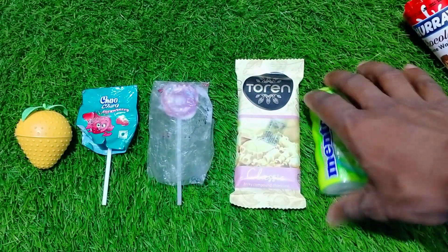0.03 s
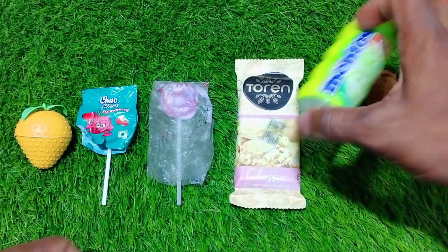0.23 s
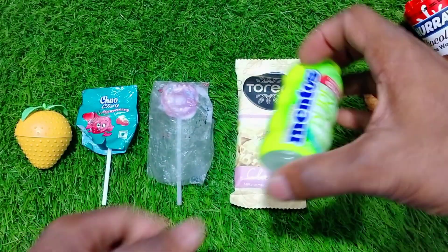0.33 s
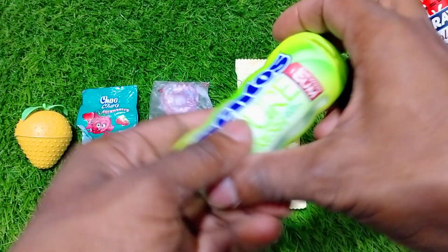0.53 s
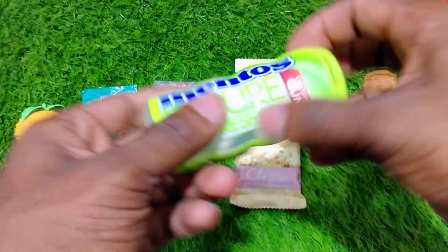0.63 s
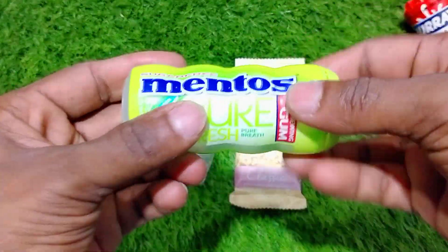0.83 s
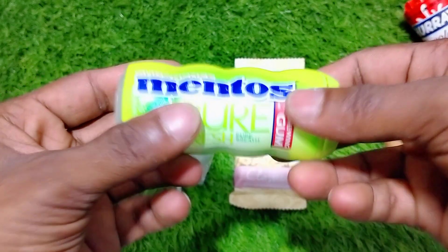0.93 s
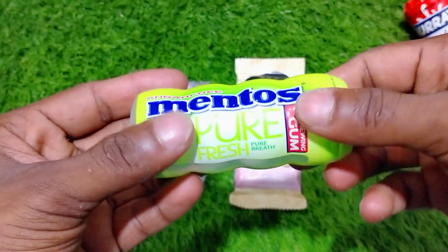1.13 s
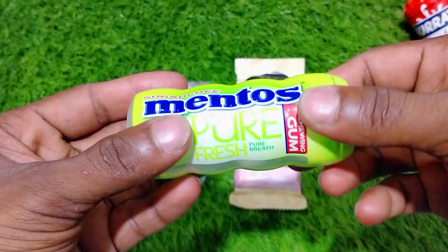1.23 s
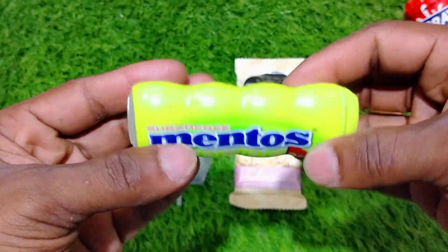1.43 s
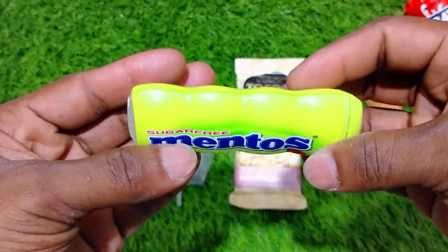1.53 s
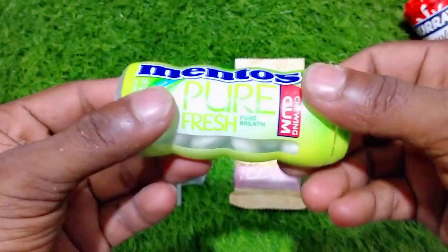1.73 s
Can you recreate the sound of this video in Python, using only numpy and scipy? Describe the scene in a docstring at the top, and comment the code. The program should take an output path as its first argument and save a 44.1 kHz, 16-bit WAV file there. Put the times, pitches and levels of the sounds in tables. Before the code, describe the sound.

Two short rattles of hard candies come from a small plastic bottle handled close to the microphone in a quiet room. Between them come a few clicks and soft rubbing, and faint finger taps follow the second.

```python
"""Hard candies tumble inside a small plastic bottle, close to the microphone in a small quiet room:
once as the bottle is lifted and once as it is turned over. Each knock rings the hollow body and
the stiff wall, with a bright crack at the contact. Fingers tap and slide on the plastic around the
tumbles, and the other hand takes hold with a soft thump. Low rumble and room tone lie underneath."""
import sys
import numpy as np
from scipy import signal
from scipy.fft import rfft, irfft
from scipy.io import wavfile

SR = 44100
rng = np.random.default_rng(int(sys.argv[2]) if len(sys.argv) > 2 else 0)


def log_audio(samples):
    """Write samples as a 16-bit WAV file to the path given in sys.argv[1]."""
    # one column per channel
    frames = np.atleast_2d(samples).T
    # limit to full scale, then quantise
    limited = np.clip(frames, -1, 1)
    pcm = np.round(limited * 32767).astype(np.int16)
    wavfile.write(sys.argv[1], SR, pcm)


N = 79380

# Candies hitting the bottle. Each row: start in seconds, relative levels of body, wall and crack
# in dB, wall pitch in Hz, body pitch in Hz.
CANDY_KNOCKS = [(0.177, -36.5, -42.5, -49, 2310, 1077), (0.1911, -39, -43, -49.5, 2310, 1060),
                (0.1973, -36.5, -39, -47, 2330, 950), (0.2014, -44, -34.5, -39, 2300, 885),
                (0.2032, -25, -18.5, -26.5, 2280, 894), (0.2081, -33.5, -25.5, -43.5, 2300, 970),
                (0.2098, -27, -36, -43, 2250, 950), (0.2133, -47, -31.5, -39.5, 2280, 895),
                (0.2179, -39.5, -29.5, -40.5, 2280, 910), (0.22, -27.5, -26, -37.5, 2220, 974),
                (0.2238, -34.5, -30.5, -39, 2250, 1080), (0.2325, -27.5, -26.5, -34, 2350, 850),
                (0.2435, -39, -38, -41, 2400, 972), (0.2455, -34, -36, -42.5, 2530, 1020),
                (0.2496, -26, -29, -36.5, 2420, 1036), (0.252, -28.5, -37, -42, 2290, 1142),
                (0.2571, -35.5, -23, -33.5, 2190, 1220), (0.2599, -29.5, -34, -35, 2130, 1080),
                (0.2697, -35, -25.5, -41.5, 2380, 1097), (0.2823, -39.5, -36, -48.5, 2160, 1040),
                (0.288, -39, -41, -51, 1950, 1260), (0.3297, -48, -40.5, -52.5, 2240, 1020),
                (0.353, -53, -42.5, -58, 2150, 1120), (0.3735, -48, -40.5, -57, 2130, 960),
                (0.3973, -53, -55, -71, 1850, 1090), (0.4134, -52.5, -48.5, -62, 2470, 1180),
                (0.4445, -40.5, -43, -41, 2400, 1100), (0.4471, -26.5, -31, -38.5, 2540, 1073),
                (0.4658, -55, -37.5, -58, 2180, 990), (0.4759, -38.5, -36, -54, 1750, 1160),
                (0.4808, -56, -46.5, -55, 2070, 1150), (0.9797, -30, -40.5, -33, 2230, 1007),
                (0.9846, -39, -38, -44.5, 1940, 1010), (0.9926, -46.5, -44, -59.5, 2290, 1130),
                (1.0035, -36.5, -40.5, -42.5, 2190, 1070), (1.0087, -38.5, -28.5, -39.5, 2060, 1230),
                (1.0212, -31.5, -33, -46.5, 1800, 1010), (1.0255, -44.5, -30.5, -36, 2980, 960),
                (1.0308, -31, -32, -40.5, 2630, 1064), (1.036, -31.5, -34.5, -40.5, 2110, 1040),
                (1.0428, -25, -24, -23.5, 2130, 854), (1.0445, -28, -29, -26, 2100, 756),
                (1.0535, -30, -27.5, -36.5, 2150, 1000), (1.06, -27, -33, -36.5, 2170, 1010),
                (1.081, -36, -34.5, -48, 1930, 1050), (1.089, -44, -33, -47.5, 2020, 1180),
                (1.0934, -31, -31.5, -43.5, 2040, 1000), (1.0967, -35.5, -44, -53, 2310, 992.5),
                (1.112, -31.5, -38, -46, 2040, 985.5), (1.1159, -35.5, -37.5, -56, 2120, 990),
                (1.1227, -38.5, -26, -39, 2080, 1046), (1.1288, -46, -38, -47.5, 1990, 1190),
                (1.1346, -32.5, -27.5, -31, 1940, 1050), (1.1486, -28, -31.5, -34, 2420, 1000),
                (1.1516, -44.5, -28.5, -37.5, 2770, 860), (1.2282, -34.5, -38.5, -45, 2230, 1067),
                (1.2446, -46, -48, -58, 1930, 1074)]
# Fingers tapping the bottle. Each row: the same columns as the candy knocks.
FINGER_TAPS = [(0.0274, -35, -44.5, -61, 2630, 1090), (0.0312, -45.5, -37, -52, 2490, 980),
               (0.0584, -42.5, -44, -73, 2864, 1040), (0.0625, -50.5, -50, -68.5, 2610, 990),
               (0.0856, -44, -47.5, -81, 2570, 920), (0.1093, -59.5, -50.5, -59, 2470, 1010),
               (0.118, -41.5, -46.5, -69, 2580, 980), (0.1338, -53, -58, -83, 1900, 1093),
               (0.5059, -45.5, -42.5, -48, 3150, 1080), (0.525, -59, -52, -55, 3100, 1080),
               (0.5421, -40.5, -46, -63, 2400, 1220), (0.5707, -45, -39.5, -45, 1780, 1170),
               (0.5805, -56, -32, -50, 2920, 1080), (0.6292, -49, -35, -43.5, 2080, 1000),
               (0.6525, -61, -42.5, -53, 2850, 880), (0.6943, -74, -51.5, -71, 2650, 1140),
               (0.8004, -61, -56.5, -66.5, 2210, 1166), (0.9381, -61, -60, -67, 1730, 1210),
               (0.9517, -59, -57, -66, 2200, 1227), (1.2697, -42.5, -43.5, -55.5, 1800, 1080),
               (1.3104, -56, -48.5, -68.5, 1670, 1084), (1.3567, -44.5, -39.5, -51, 2165, 1060),
               (1.368, -70, -48, -70, 1930, 1082), (1.4084, -48, -50.5, -52.5, 1940, 1130),
               (1.5072, -54.5, -50, -71.5, 1830, 1173), (1.5833, -63, -66.5, -84, 1960, 1153),
               (1.6459, -52.5, -50, -60, 1724, 1077), (1.6698, -63, -52.5, -60.5, 2350, 1038),
               (1.6826, -57.5, -57, -70, 2350, 1210), (1.7203, -52, -51, -62, 1820, 1260),
               (1.7411, -50, -54, -60, 2080, 1026), (1.7536, -57, -70, -83, 1860, 920)]
# Modes of the hollow body and of the stiff wall. Each row: multiple of the pitch, relative level in dB,
# nominal time to fall 60 dB in seconds.
BODY_MODES = [(.8, -13, 0.016), (.94, -1, 0.02), (1.01, -0.5, 0.024), (1.1, -4, 0.022), (1.2, -5, 0.019)]
WALL_MODES = [(.76, -9, 0.014), (.94, -1.5, 0.01), (1.01, 0.5, 0.012), (1.1, -4.5, .012),
              (1.3, -9.5, 0.011), (1.7, -20, 0.015)]
# Tumbles in which lighter pieces jostle. Each row: start and end in seconds, relative level in dB.
JOSTLE_SPANS = [(0.203, 0.278, -43), (0.264, 0.301, -58), (.99, 1.156, -48.5)]
# Lasting tones of the bottle. Each row: frequency in Hz, gain at resonance in dB, 60 dB decay in seconds.
BOTTLE_TONES = [(714, -10.5, 0.35), (782, -9, .25), (953.4, -8.5, 0.16), (1048, -9, .22), (1208, -6, 0.2),
                (1970, -11.5, .2), (2160, -10, .3), (2334, -9.5, 0.22), (2820, -10, 0.33), (3739, -5, 0.11)]
# Skin sliding on plastic. Each row: start and end in seconds, rub level in dB, hiss level in dB.
FINGER_SLIDES = [(-.04, 0.09, -60, -92), (0.069, .21, -65, -64), (0.295, 0.424, -62, -73),
                 (0.409, 0.621, -56, -56.5), (0.59, 0.778, -70.5, -71), (0.782, 0.831, -66, -70),
                 (.8, 1.0, -85, -74.5), (1.2, 1.436, -71, -75.5), (1.43, 1.63, -73, -95),
                 (1.61, 1.79, -73.5, -80.5)]
# Bands of the room's tail. Each row: low and high edge in Hz, level in dB, 60 dB decay in seconds.
ROOM_BANDS = [(100, 1600, -12.5, 0.28), (1440, 5000, -17.5, 0.19), (4200, 17000, -10, 0.16)]
# Rise and fall of the rumble. Each row: time in seconds, level in dB.
RUMBLE_LEVELS = [(0, -68.5), (.3, -62.5), (.7, -66.5), (.85, -72), (1.1, -66.5), (1.8, -78.5)]
# Spectra of the noises, from contact crack to room tone. Each row: frequency in Hz, relative level in dB.
CRACK_SPECTRUM = [(200, -3), (400, -9), (650, -9), (1500, -6), (3000, -6), (4000, 3.5), (5200, -1.5),
                  (6800, -0.5), (8100, 3), (9200, -8), (11500, -9.5), (13500, -8), (15500, -2.5)]
RUB_SPECTRUM = [(100, -5), (500, -2.5), (1050, 6), (1600, 5.5), (3000, 1), (5500, -14), (8000, -17),
                (10500, -18.5), (15500, -21.5)]
HISS_SPECTRUM = [(1000, -7.5), (4000, -2.5), (6000, -10.5), (8000, -3.5), (10500, -10.5), (13000, -1),
                 (15500, 0)]
THUMP_SPECTRUM = [(30, -2), (140, 7), (220, -3), (500, -38), (3000, -70)]
RUMBLE_SPECTRUM = [(20, -0.5), (55, -2.5), (82, 1.5), (130, -6.5), (220, -10.5), (400, -24), (2000, -62.5)]
ROOM_TONE_SPECTRUM = [(20, -4), (50, -1), (85, -1.5), (150, -4.5), (300, -9), (600, -13), (1200, -16),
                      (2500, -25), (5000, -31), (10000, -34.5), (16000, -34.5)]

CANDY_RING, TAP_RING = 1.04, .75  # these scale the decay times: fingers damp the bottle
BODY_TRIM_DB, WALL_TRIM_DB, CRACK_TRIM_DB = .54, .46, 2
CHATTER_S, CHATTER_DB = .001103, -3.5  # each knock sounds again about a millisecond later, a little weaker
MODE_SCATTER_DB, MODE_DETUNE, MODE_PHASE_RAD = 2, .0058, .8  # spreads from blow to blow
CONTACT_RISE_S, CRACK_T60_S = .00022, .011
BLOW_TIME = np.arange(4096) / SR


def knocks(table, ring):
    """Candies or fingertips strike the bottle, one knock for each row."""
    out = np.zeros(N)
    for start, *blow in table:
        add(out, start, knock(*blow, ring))
    return out


def knock(body_db, wall_db, crack_db, wall_hz, body_hz, ring):
    """A contact and its quick second touch each ring body and wall and give off a crack."""
    t = BLOW_TIME
    lag = CHATTER_S * (.5 + rng.random())
    t_second = np.maximum(t - lag, 0)
    second_gain = undb(CHATTER_DB) * (t > lag)
    body = modes(BODY_MODES, body_hz, ring, t) + second_gain * modes(BODY_MODES, body_hz, ring, t_second)
    wall = modes(WALL_MODES, wall_hz, ring, t) + second_gain * modes(WALL_MODES, wall_hz, ring, t_second)
    crack_decay = fade(t, CRACK_T60_S * ring) + second_gain * fade(t_second, CRACK_T60_S * ring)
    crack = noise(CRACK_SPECTRUM, len(t)) * crack_decay
    return (at_level(body, body_db + BODY_TRIM_DB)
            + at_level(wall, wall_db + WALL_TRIM_DB)
            + at_level(crack, crack_db + CRACK_TRIM_DB))


def modes(table, pitch_hz, ring, t):
    """Damped modes, their strength and phase drawn afresh as each blow lands somewhere else."""
    ratio, db, t60 = np.array(table).T[:, :, None]
    detune, scatter, phase = rng.standard_normal((3, len(table), 1))
    hz = ratio * pitch_hz * (1 + MODE_DETUNE * detune)
    waves = np.sin(2 * np.pi * hz * t + MODE_PHASE_RAD * phase)
    ringing = undb(db + MODE_SCATTER_DB * scatter) * waves * fade(t, t60 * ring)
    return ringing.sum(0) * (1 - np.exp(-t / CONTACT_RISE_S))


def jostle(hits_per_s=170):
    """Lighter pieces make random contacts between the main knocks of a tumble."""
    out = np.zeros(N)
    for start, end, db in JOSTLE_SPANS:
        for slot in np.arange(start, end, 1 / hits_per_s):
            strength, pitch = rng.standard_normal(2)
            hit_db = db + 1.4 * strength
            at = slot + rng.random() / hits_per_s
            hit = knock(body_db=hit_db, wall_db=hit_db, crack_db=hit_db - 5,
                        wall_hz=2330 * np.exp(.12 * pitch), body_hz=1020, ring=CANDY_RING)
            add(out, at, hit)
    return out


def bottle_radiation(x, low_hz=450, gap_hz=540, gap_db=-6):
    """A small bottle gives off little bass, with a gap just below its lowest modes."""
    gap_band = signal.lfilter(*signal.iirpeak(gap_hz, Q=1.4, fs=SR), x)
    bass_cut = signal.butter(2, low_hz, "high", fs=SR, output="sos")
    return signal.sosfilt(bass_cut, x - (1 - undb(gap_db)) * gap_band)


def bottle_resonance(x):
    """Narrow resonances, stirred by every contact, sing on faintly after the knocks."""
    out = x
    for hz, db, t60 in BOTTLE_TONES:
        radius = fade(1 / SR, t60)
        pole = radius * np.exp(2j * np.pi * hz / SR)
        out = out + undb(db) * 2 * (1 - radius) * signal.lfilter([1], [1, -pole], x).real
    return out


def finger_slides(fade_s=.025, rough_db=3, grains_per_s=400):
    """Skin slides on plastic with a grainy rub and a thin hiss as the grip changes."""
    t = np.arange(N) / SR
    rub, hiss = noise(RUB_SPECTRUM, N), noise(HISS_SPECTRUM, N)
    grain = np.interp(t * grains_per_s, np.arange(N), rng.standard_normal(N))
    rub = rub * undb(rough_db * grain)
    out = np.zeros(N)
    for start, end, rub_db, hiss_db in FINGER_SLIDES:
        envelope = np.clip(np.minimum(t - start, end - t) / fade_s, 0, 1)
        out += envelope * (undb(rub_db) * rub + undb(hiss_db) * hiss)
    return out


def grab_thump(start_s=.443, db=-57):
    """The bottle meets the other hand with a soft thump."""
    out = np.zeros(N)
    add(out, start_s, undb(db) * noise(THUMP_SPECTRUM, len(BLOW_TIME)) * fade(BLOW_TIME, t60=.07))
    return out


def rumble():
    """Low rumble, strongest while the arms move most."""
    times, db = np.array(RUMBLE_LEVELS).T
    return undb(np.interp(np.arange(N) / SR, times, db)) * noise(RUMBLE_SPECTRUM, N)


def room(x, early_db=-10.5, tail_onset_s=.0029):
    """Direct sound reaches the microphone, then reflections off hands and table, then a short tail."""
    t = np.arange(SR // 2) / SR
    early = rng.standard_normal(len(t)) * fade(t, t60=.028) * (t > .002)
    response = undb(early_db) * early / np.linalg.norm(early)
    for low_hz, high_hz, db, t60 in ROOM_BANDS:
        band = signal.butter(3, [low_hz, high_hz], "band", fs=SR, output="sos")
        tail = signal.sosfilt(band, rng.standard_normal(len(t)))
        envelope = fade(t, t60) * np.clip(t / tail_onset_s - 1, 0, 1)
        response += undb(db) * tail * envelope / np.linalg.norm(envelope)
    return x + signal.fftconvolve(x, response)[:N]


def room_tone(db=-69.5):
    """The steady, dull hush of the quiet room."""
    return undb(db) * noise(ROOM_TONE_SPECTRUM, N)


def undb(db):
    """Decibels to gain."""
    return 10 ** (np.asarray(db) / 20)


def noise(spectrum, size):
    """Noise of unit level, coloured by a spectrum."""
    hz, db = np.array(spectrum).T
    bin_hz = np.maximum(np.fft.rfftfreq(size, 1 / SR), 1)
    gain = undb(np.interp(np.log(bin_hz), np.log(hz), db))
    x = irfft(rfft(rng.standard_normal(size)) * gain, size)
    return x / x.std()


def at_level(blow, db):
    """Set the level of a blow, as its energy spread over four milliseconds (176 samples)."""
    return blow * undb(db) / np.sqrt(np.sum(blow ** 2) / 176)


def fade(t, t60):
    """Exponential decay, 60 dB down after t60 seconds."""
    return np.exp(-np.log(1000) * t / t60)


def add(out, start_s, x):
    """Mix a sound in at a time."""
    i = int(np.clip(start_s * SR, 0, N - 1))
    out[i:i + len(x)] += x[:N - i]


def scene():
    """Candies and fingers on the bottle, close to one microphone, with the room behind."""
    contacts = undb(-.5) * (knocks(CANDY_KNOCKS, CANDY_RING) + knocks(FINGER_TAPS, TAP_RING)) + jostle()
    bottle = bottle_resonance(bottle_radiation(contacts))
    background = room_tone() + rumble() + finger_slides() + grab_thump()
    return (room(bottle) + background)[None]


def record(dry):
    """The recorder cuts the treble steeply above 15.9 kHz."""
    return signal.sosfilt(signal.ellip(8, .2, 70, 15900, fs=SR, output="sos"), dry)


dry = scene()
out = record(dry)
log_audio(out)
```